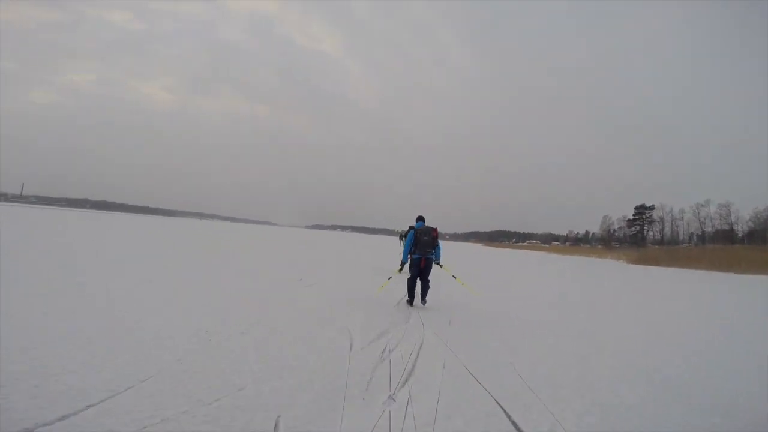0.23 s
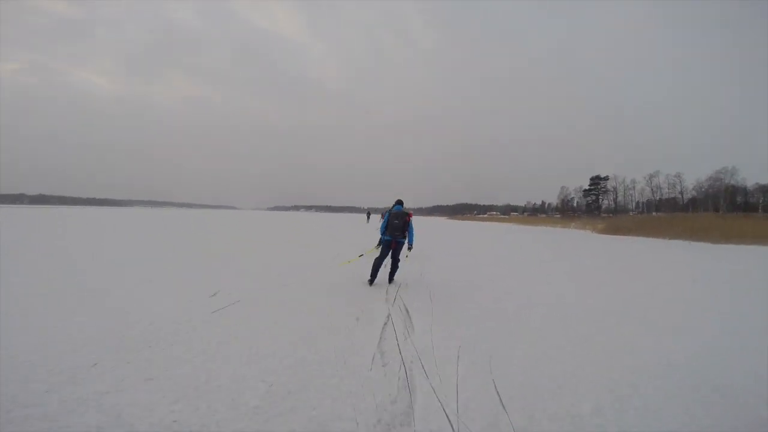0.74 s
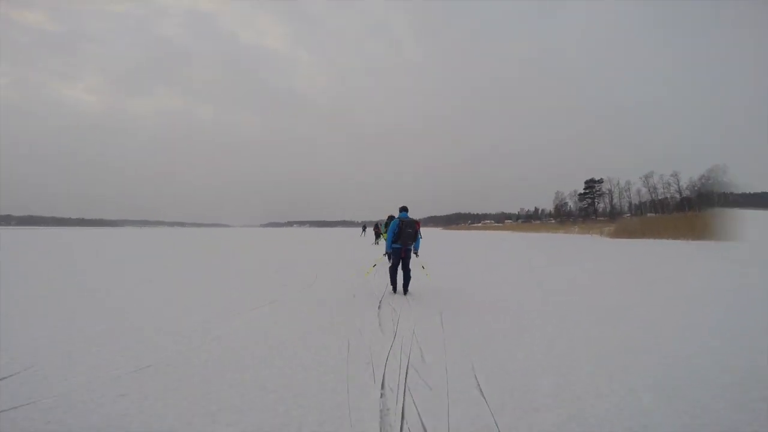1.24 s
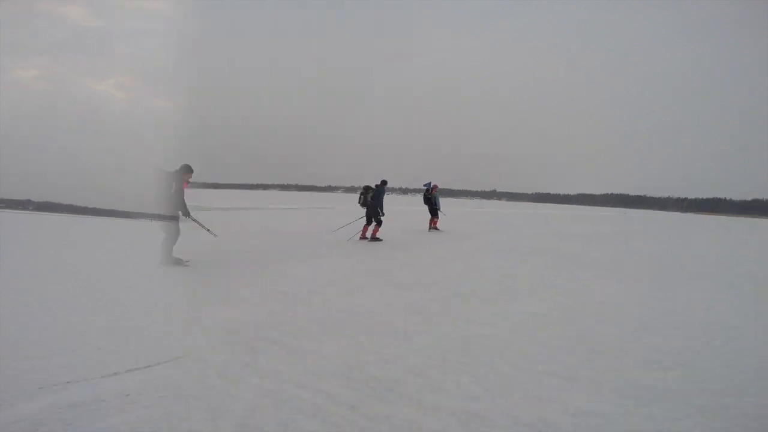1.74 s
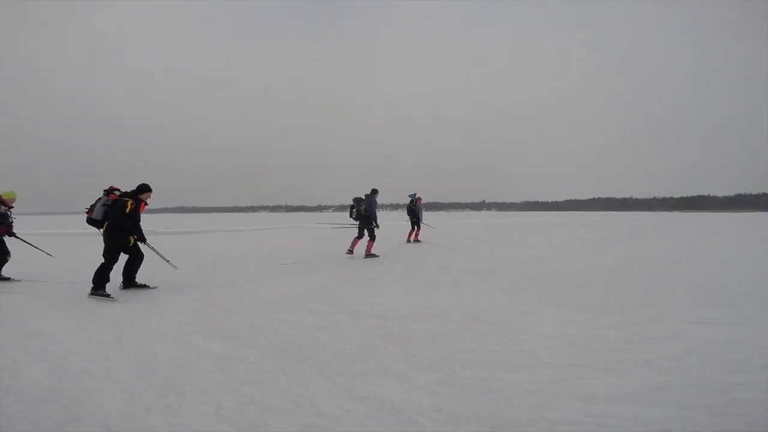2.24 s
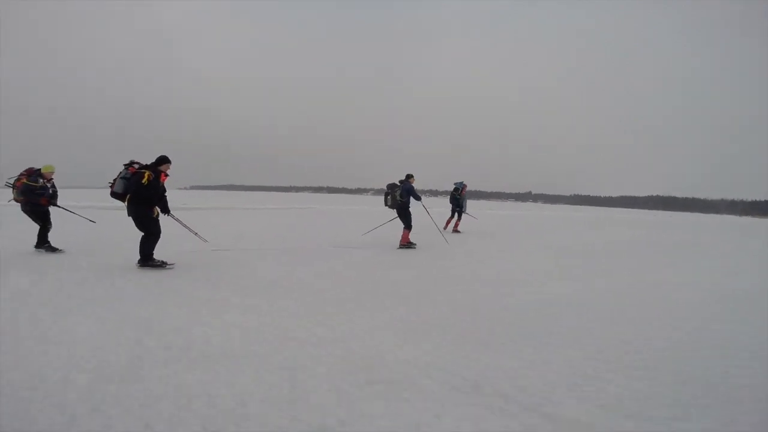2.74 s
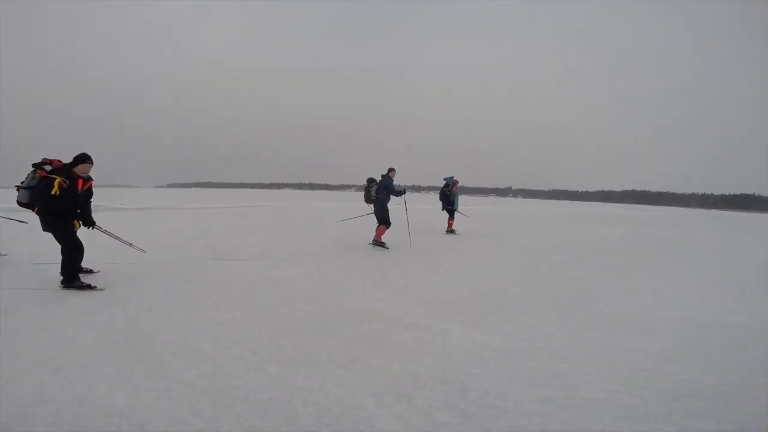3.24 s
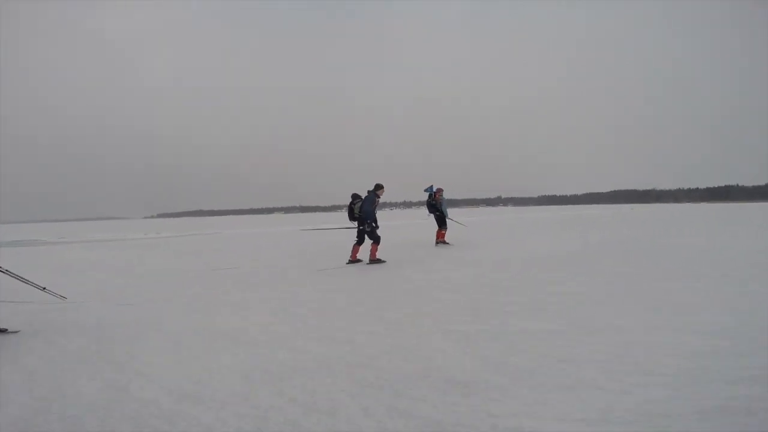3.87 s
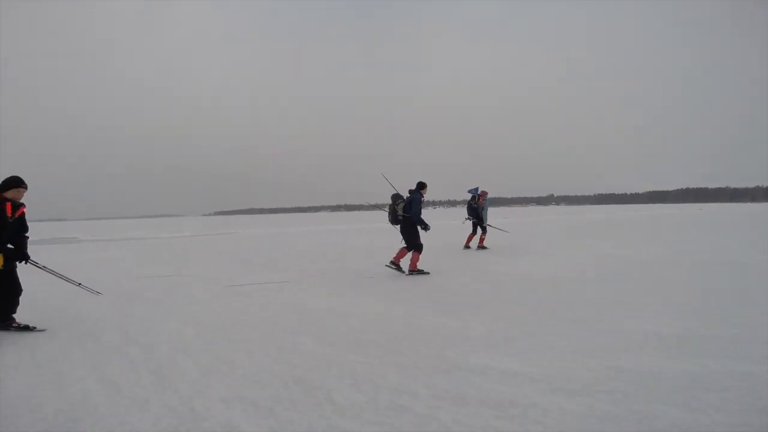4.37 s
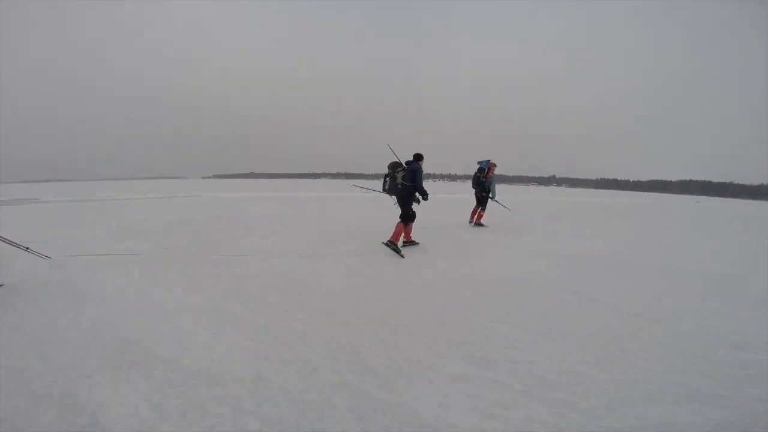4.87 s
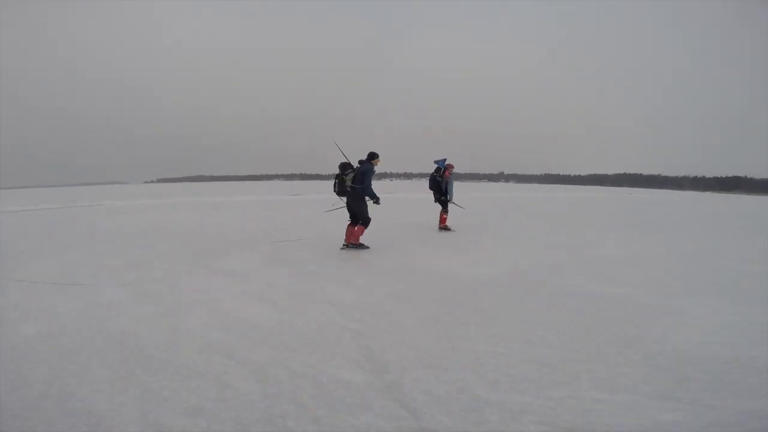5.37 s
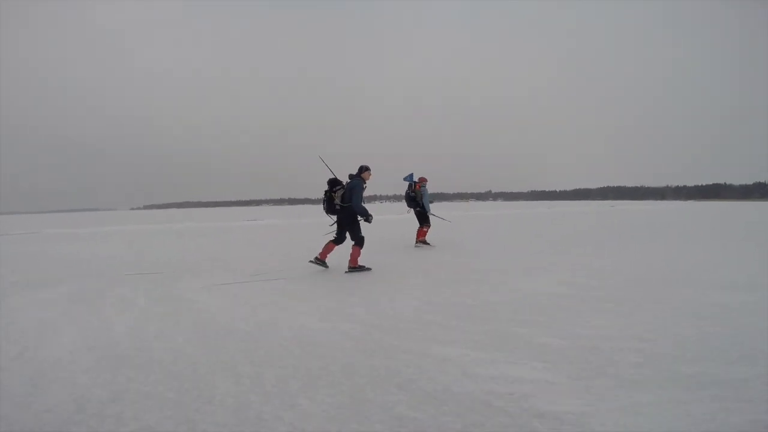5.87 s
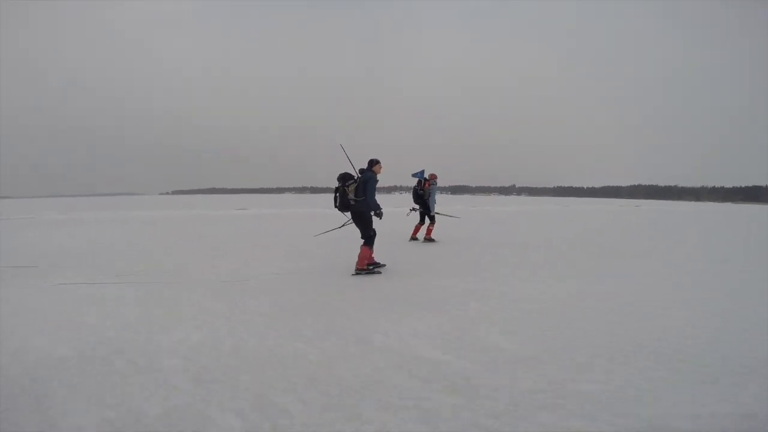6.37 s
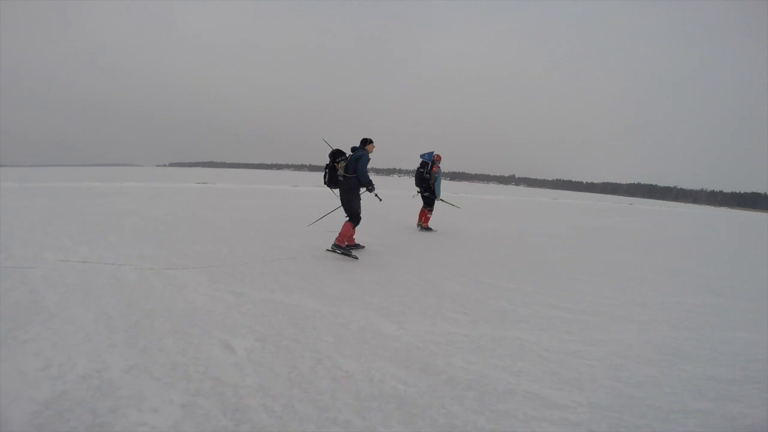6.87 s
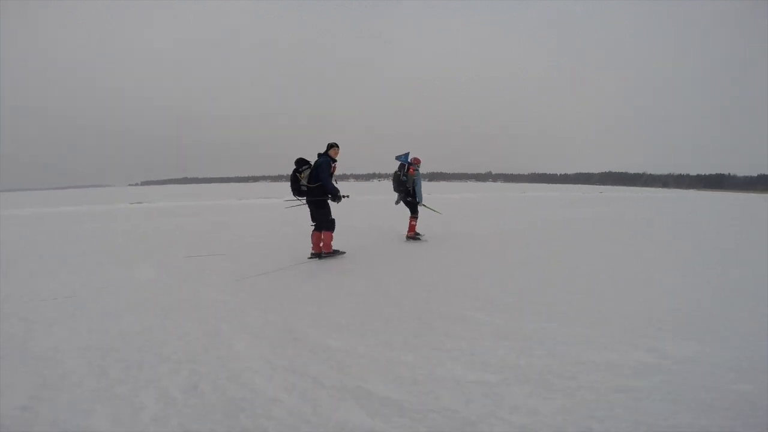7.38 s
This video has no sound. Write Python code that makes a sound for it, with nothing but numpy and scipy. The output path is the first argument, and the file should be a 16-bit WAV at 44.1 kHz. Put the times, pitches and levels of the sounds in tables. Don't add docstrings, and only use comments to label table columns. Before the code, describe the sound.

A small camera shut in a hard case rides with a skater across a frozen lake, so everything is close, boxy and dry. Low wind buffeting starts weak, swells by 0.3 s, drops near 0.8, then surges around 3.2 and from 3.8 to 6.5. Under it steel blades rub continuously with a thin icy hiss. Thuds and a clack come at 0.3 to 0.7; a short ping at 0.85; the loudest, densest rattle of jolts and scraping runs 1.0 to 1.4. Around 2.0 a blade bites and judders, followed by frequent knocks and bright chips through 3.4. A longer, soft singing scrape begins at 3.7. Light steel taps cluster at 4.0 to 4.6, a slow cracking judder at 4.7, then a sparser stretch. Quick catches and pole clicks bunch at 5.7 to 6.1, taps continue 6.2 to 7.4, and a buzzing bite closes at 7.5.

```python
import sys
import numpy as np
from scipy import signal
from scipy.fft import rfft, irfft, next_fast_len
from scipy.io import wavfile
from scipy.ndimage import uniform_filter1d

SR = 44100
rng = np.random.default_rng(int(sys.argv[2]) if len(sys.argv) > 2 else 0)


def to_wav(sig):
    pcm = np.clip(np.atleast_2d(sig), -1, 1) * 32767
    pcm = np.round(pcm).astype(np.int16)
    wavfile.write(sys.argv[1], SR, pcm.T)


def convert_level_to_amplitude(level_db):
    exponent = np.asarray(level_db, float) / 20
    return 10 ** exponent


N = 335601
TIME = np.arange(N) / SR

# (time [s], gust level [dB], share of fine eddies [dB])
WIND_GUSTS = [(0.0, -37.5, -12), (.274, -22.5, -11), (.55, -24, -14.5), (.83, -34.5, -14.5),
              (1.15, -27, -7.5), (1.76, -33, -2), (2.07, -26, -6), (3.2, -19, -9), (3.29, -29, -9),
              (3.5, -28.5, -5.5), (3.79, -19, -8.5), (4.4, -19.5, -2.5), (5.4, -22, -6.5), (6.1, -20, -4.5),
              (6.9, -24, -2.5), (7.07, -34.5, 0), (7.3, -24, -5), (7.61, -24, -6.5)]
# (frequency [Hz], level [dB per Hz])
RUMBLE_TONE = [(26, -52), (45, -1), (86, 2.5), (140, -0.5), (258, -9), (400, -18), (520, -45), (880, -120)]
# (frequency [Hz], level [dB per Hz])
WHOOSH_TONE = [(88, -15), (150, -1.5), (189, -4), (421, -7), (655, -13), (841, -14.5), (1500, -30),
               (1950, -88), (3300, -120)]
# (frequency [Hz], width [Hz], level [dB])
CASE_MODES = [(906, 132, 1.5), (1830, 367, -6.5), (2805, 66, -19.5), (3034, 187, -19)]
# (frequency [Hz], level [dB per Hz])
DUST_TONE = [(2290, -10.5), (3900, 0.5), (4530, -2.5), (4940, 1), (5480, -4.5), (6370, -2), (6830, -5),
             (8500, -6.5), (9270, -11), (11800, -11), (14800, -28), (15500, -26)]
# (start [s], length [s], scrape level [dB], ice dust over scrape [dB],
# swell from start to end [dB])
STROKES = [(0.258, 0.3, -37, -13.5, -8), (1.013, 0.26, -30.5, -15.5, -4.5), (1.185, 0.11, -27.5, -8.5, 2),
           (1.313, 0.12, -35.5, -8, 4), (1.72, 0.3, -43, -13.5, -2), (2.037, 0.29, -39, -15, -9),
           (2.818, 0.41, -36.5, -15.5, 5), (3.658, 0.67, -38.5, -11.5, -9), (4.728, 0.177, -34, -22, -10),
           (5.733, 0.31, -31, -14.5, -0.5), (6.567, 0.24, -38.5, -16.5, -10), (7.47, 0.24, -36, -18, -10)]
# (time [s], thud level [dB], ring over thud [dB], crack over thud [dB])
BUMPS = [(0.041, -22.5, -36, -24), (0.134, -23, -13, -32), (0.3, -10.5, -11, -26), (0.723, -12, -8, -44),
         (0.794, -18, -25, -30), (0.854, -26.5, 6, -5), (1.058, -13, 5.5, -25), (1.21, -10, -4, -15),
         (1.239, -3, 3, -26), (1.258, -8, -1, -24), (1.277, -8, -13, -20), (1.314, -23, -3, -13),
         (1.337, -20.5, -12, -21), (1.375, -14, -1.5, -22), (1.411, -4.5, -3, -22.5),
         (1.822, -17.5, 4, -24.5), (1.872, -13, 0.5, -20), (2.019, -11.5, -8, -25), (2.157, -11, 2.5, -25),
         (2.397, -12, 0, -23.5), (2.55, -16, -1.5, -17), (2.764, -14.5, -6, -15.5), (3.232, -10, 1, -22.5),
         (3.678, -18, 0, -12), (4.077, -14.5, -4, -19), (4.477, -13.5, -0.5, -23.5), (5.159, -16, -19, -25),
         (6.523, -11.5, -0.5, -17.5), (6.937, -13, 4.5, -19)]
# (time [s], peak [dB], ring [Hz], crack [dB])
POLES = [(0.1885, -23, 1770, -32), (0.5317, -7.5, 1900, -24), (0.818, -24, 1680, -15),
         (1.0375, -16.5, 1960, -14), (1.1982, -7, 1820, -41), (1.2654, -11, 1990, -13),
         (1.5748, -18.5, 2280, -25.5), (1.7075, -24, 2020, -24), (1.8966, -9.5, 1690, -25),
         (2.0068, -13.5, 1820, -28.5), (2.2398, -14.5, 2140, -22.5), (2.2702, -11.5, 1750, -26),
         (2.5785, -20.5, 1780, -37), (2.7142, -24, 2020, -19), (3.1023, -13.5, 1830, -17.5),
         (3.1842, -13.5, 1680, -28), (3.277, -9.5, 1730, -28.5), (3.3538, -21, 1710, -22),
         (3.9125, -11, 1960, -17.5), (4.0243, -23, 1990, -23), (5.3677, -12.5, 1730, -25.5),
         (5.7573, -14, 1810, -32), (5.8072, -11, 2120, -21), (5.8436, -18.5, 1830, -13),
         (5.9084, -14, 1820, -19.5), (6.0192, -17, 1830, -33), (6.0586, -13, 2640, -12),
         (6.8728, -23, 1730, -29), (6.8862, -8, 1820, -26.5), (7.2419, -22, 1740, -34)]
# (time [s], peak [dB], crack [dB])
CHIPS = [(0.2386, -40, -3), (0.293, -21, -20.5), (0.401, -36, -17), (0.4724, -24, -24), (0.553, -31, -10),
         (0.7078, -19, -30), (1.0216, -25, -9), (1.1284, -26, -21), (1.1623, -22, -19), (1.8016, -17, -33),
         (1.9394, -31, -7), (1.9715, -19, -21), (2.4584, -19.5, -18.5), (2.6274, -15, -31),
         (2.847, -12, -30), (2.913, -19.5, -31), (2.9966, -30, -19), (3.041, -13.5, -21),
         (3.1185, -17, -19), (3.583, -21, -25), (3.6004, -25, -16.5), (3.9833, -32, -10), (4.4247, -33, -9),
         (4.546, -38.5, -5), (5.0035, -23, -17), (5.18, -34, -12), (5.9735, -47, 9), (6.7867, -33, -9),
         (7.141, -18.5, -24), (7.425, -25, -20)]
# (time [s], peak [dB], crack [dB])
TICKS = [(0.9337, -30, -15), (1.511, -29, -41), (1.5954, -23.5, -31), (1.6866, -25.5, -25.5),
         (1.7535, -28.5, -21), (1.923, -30, -23), (2.198, -22, -25), (2.369, -22, -27), (2.5223, -29, -36),
         (3.3185, -23.5, -37), (3.393, -27, -36), (3.647, -22.5, -25), (4.307, -23, -25.5),
         (4.366, -21.5, -22.5), (4.589, -24.5, -22), (4.6202, -23, -26), (5.613, -24, -44),
         (6.9685, -30, -34)]
# (time [s], peak [dB], ring [Hz], crack [dB])
TAPS = [(1.5297, -15.5, 1830, -28.5), (2.326, -19, 2700, -13.5), (2.344, -14, 2020, -36),
        (2.813, -19, 2000, -15), (3.77, -21.5, 1940, -33), (4.1101, -21.5, 1790, -16),
        (4.262, -9, 1728, -30), (4.398, -18.5, 1630, -26.5), (4.4534, -11.5, 1760, -33),
        (4.8584, -16.5, 1910, -30), (5.0498, -20, 1870, -25.5), (5.4136, -23, 2020, -27),
        (5.454, -16, 1750, -31), (5.881, -15, 1780, -20), (5.939, -23, 1700, -28),
        (6.2357, -11.5, 1830, -35), (6.2901, -23, 1700, -34), (6.3832, -9, 1800, -27.5),
        (6.575, -14, 2100, -30), (6.6155, -14.5, 1770, -26), (6.767, -8.5, 1750, -39),
        (6.834, -9.5, 1780, -30.5), (6.994, -17, 2050, -21), (7.0725, -17, 1750, -39),
        (7.3683, -16.5, 1960, -23.5), (7.4034, -21, 2040, -26)]
# (time [s], length [s], level [dB])
BITES = [
    (2.011, 0.14, -28),
    (3.685, 0.43, -33),
    (4.705, 0.12, -46),
    (5.709, 0.092, -32),
    (5.88, .08, -29),
    (6.577, 0.13, -33.5),
    (7.461, 0.089, -25),
]
# (time [s], peak [dB], crack [dB])
CATCHES = [(2.0612, -11.5, -25), (2.0884, -13, -25), (2.1104, -17, -26), (3.7234, -13, -26),
           (4.7034, -12, -32), (4.8242, -25.5, -14), (5.7102, -8, -28.5), (5.7267, -12.5, -30),
           (5.7654, -15, -24), (5.782, -15.5, -22), (5.817, -19, -24), (7.499, -26, -21), (7.512, -19, -28),
           (7.5303, -15, -27), (7.5562, -8.5, -24), (7.5657, -9.5, -35)]
# (time [s], period [s], first slip [dB], fade per slip [dB], crack [dB])
JUDDER = [
    (2.025, 0.012, -11.5, 6, -34),
    (3.693, 0.0093, -22, 2.5, -40),
    (4.723, 0.014, -12.5, 2.5, -28.5),
    (7.464, .0092, -14.5, 1, -33),
]

MUFFLE = signal.ellip(5, 1, 45, 3500, fs=SR, output="sos")

OPENING_S, OPENING_DUST_DB, OPENING_HEAVE_DB = 1.5, 5.5, 2.5
CALM_DB, HEAVE_DB, HEAVE_PER_GUST, HEAVE_SWING_DB = -26.5, -34, 0.3, 2.5
COAST_DB, COAST_PER_GUST, COAST_DUST_DB = -45.5, 0.29, -13.5
SET_DOWN_S, LIFT_S = 0.0091, 0.024

RING_HZ, UPPER_HZ = 1780, 3090
LEAD_S = 0.0006
CRACK_TRIM_DB, BUMP_TRIM_DB = -6.5, -2
POLE_THUD_DB, TAP_THUD_DB, CATCH_THUD_DB = -6, -8.5, -10.5
UPPER_DB, UPPER_PER_CRACK, USUAL_CRACK_DB = -11, 0.77, -34


def unit(x):
    return x / np.sqrt(np.mean(x ** 2))


def curves(table):
    s, *columns = np.transpose(table)
    return [np.interp(TIME, s, c) for c in columns]


def colour(x, points):
    hz, db = np.transpose(points)
    size = next_fast_len(len(x))
    f = np.arange(size // 2 + 1) * SR / size + 1
    gain = convert_level_to_amplitude(np.interp(np.log(f), np.log(hz), db))
    return irfft(rfft(x, size) * gain, size)[:len(x)]


def resonate(x, hz, width):
    r = np.exp(-np.pi * width / SR)
    turn = 2 * np.pi * hz / SR
    return signal.lfilter([2 * (1 - r) * np.sin(turn)], [1, -2 * r * np.cos(turn), r * r], x)


def walk(rate):
    k = max(int(SR / rate), 1)
    held = rng.standard_normal(N)[np.arange(N) // k]
    return unit(uniform_filter1d(uniform_filter1d(held, k), k))


def grit(per_s, spread_db, smear_s):
    chance = rng.random((2, N))
    sizes = convert_level_to_amplitude(-spread_db * np.log(1.05 - chance[1]))
    chips = (chance[0] < per_s / SR) * sizes
    return signal.lfilter([1], [1, -np.exp(-1 / (smear_s * SR))], chips)


def wind():
    gust_db, fine_db = curves(WIND_GUSTS)
    lumps_db = 0.9 * walk(rate=30)
    rumble = unit(colour(rng.standard_normal(N), RUMBLE_TONE)) * convert_level_to_amplitude(1.3 * lumps_db)
    puffs = convert_level_to_amplitude(0.8 * walk(rate=45) + 2.4 * walk(rate=110) + lumps_db)
    whoosh = unit(colour(rng.standard_normal(N) * puffs, WHOOSH_TONE))
    heave = unit(resonate(rng.standard_normal(N), 34, 30))
    heave_db = HEAVE_DB + HEAVE_PER_GUST * (gust_db - CALM_DB) + HEAVE_SWING_DB * walk(rate=4)
    heave_db = heave_db + OPENING_HEAVE_DB * (TIME < OPENING_S)
    buffet = rumble * convert_level_to_amplitude(1.0) + whoosh * convert_level_to_amplitude(fine_db + 3.5)
    return convert_level_to_amplitude(gust_db) * buffet + heave * convert_level_to_amplitude(heave_db)


def pressure():
    gust_db = curves(WIND_GUSTS)[0]
    scrape = convert_level_to_amplitude(COAST_DB + COAST_PER_GUST * (gust_db - CALM_DB))
    dust = scrape * convert_level_to_amplitude(COAST_DUST_DB + OPENING_DUST_DB * (TIME < OPENING_S))
    for s, length, db, dust_db, swell_db in STROKES:
        on = np.clip(np.minimum((TIME - s) / SET_DOWN_S, (s + length - TIME) / LIFT_S), 0, 1)
        progress = np.clip((TIME - s) / length, 0, 1)
        push = on * convert_level_to_amplitude(db + swell_db * (progress - 0.5))
        scrape = np.hypot(scrape, push)
        dust = np.hypot(dust, push * convert_level_to_amplitude(dust_db))
    return scrape, dust


def blades():
    scrape, spray = pressure()
    chips = unit(grit(per_s=300, spread_db=6.5, smear_s=0.0027))
    sway = convert_level_to_amplitude(2.2 * walk(rate=60))
    rough = convert_level_to_amplitude(-1.5) * sway + chips
    rub = np.diff(rng.standard_normal(N + 1)) * rough
    body = np.zeros(N)
    for k, (hz, width, db) in enumerate(CASE_MODES):
        body += (-1) ** k * convert_level_to_amplitude(db) * resonate(rub, hz, width)
    body = signal.sosfilt(MUFFLE, body)
    sparkle = unit(grit(per_s=63, spread_db=0.0, smear_s=0.002))
    dust = colour(rng.standard_normal(N) * (rough + 0.13 * sparkle), DUST_TONE)
    return unit(body) * scrape * convert_level_to_amplitude(2.5) + unit(dust) * spray


def whine():
    return convert_level_to_amplitude(-80 + 2) * np.sin(2 * np.pi * 14625 * TIME)


def hit(s, peak_db, thud_db, crack_db, ring_hz):
    crack_db = crack_db + CRACK_TRIM_DB
    hard_db = crack_db - max(thud_db, 0) - USUAL_CRACK_DB
    return s - LEAD_S, peak_db, thud_db, crack_db, ring_hz, UPPER_DB + UPPER_PER_CRACK * hard_db


def steep(x, hz, width):
    return resonate(resonate(x, hz, width), hz, 4.9 * width)


def knocks(table, t60, crumble_s):
    size = 4096
    out = np.zeros(N + size)
    t = np.arange(size) / SR
    crumble = np.exp(-(t / crumble_s) ** 2) + 0.91 * np.exp(-t / 0.0019)
    for s, peak_db, thud_db, crack_db, ring_hz, upper_db in table:
        contact = rng.standard_normal(size) * crumble
        grain_db = 4.7 * rng.standard_normal(len(DUST_TONE))
        dull = signal.sosfilt(MUFFLE, np.diff(contact + 12 * (t == 0), prepend=0))
        singing = any(0 < s - start + 0.003 < length for start, length, _ in BITES)
        free = 2.5 if singing else 1
        ring = steep(dull, ring_hz, np.log(1000) / np.pi / (t60 * free))
        thud = steep(dull, CASE_MODES[0][0], 336)
        upper = resonate(dull, UPPER_HZ * (1 + 0.011 * grain_db[0]), 400)
        crack = colour(contact, [(hz, db + g) for (hz, db), g in zip(DUST_TONE, grain_db)])
        parts = [(ring, -1.5), (thud, thud_db + 3.5),
                 (upper, min(upper_db, -6) - 0.5), (crack, crack_db + 13.5)]
        at = int(s * SR)
        out[at:at + size] += convert_level_to_amplitude(peak_db) * sum(convert_level_to_amplitude(db) * p / np.abs(p).max() for p, db in parts)
    return out[:N]


def bumps():
    rows = [hit(s, db + ring + BUMP_TRIM_DB, -ring, crack - ring, RING_HZ)
            for s, db, ring, crack in BUMPS]
    return knocks(rows, t60=0.011, crumble_s=0.0045)


def poles():
    rows = [hit(s, db, POLE_THUD_DB, crack, hz) for s, db, hz, crack in POLES]
    return knocks(rows, t60=0.011, crumble_s=0.0045)


def chips():
    rows = [hit(s, db - 5, -5.5, crack + 4, CASE_MODES[1][0]) for s, db, crack in CHIPS]
    return knocks(rows, t60=0.009, crumble_s=0.0062)


def ping():
    t = np.maximum(TIME - 0.853, 0)
    t60_s = 0.079
    return convert_level_to_amplitude(-25 - 60 * t / t60_s) * np.sin(2 * np.pi * 720 * t)


def ticks():
    rows = [(s, db, -6, crack, CASE_MODES[1][0], -9) for s, db, crack in TICKS]
    return knocks(rows, t60=0.009, crumble_s=0.0062)


def taps():
    rows = [hit(s, db, TAP_THUD_DB, crack, hz) for s, db, hz, crack in TAPS]
    return knocks(rows, t60=0.01, crumble_s=0.003)


def song():
    press = np.zeros(N)
    for s, length, db in BITES:
        down = (TIME > s) * (TIME < s + length)
        press += convert_level_to_amplitude(db) * down * np.exp(-0.9 * np.abs(TIME - s) / length)
    chatter = convert_level_to_amplitude(2.0 * walk(rate=81)) * rng.standard_normal(N)
    steel = unit(resonate(chatter, 1800, 80))
    return steel * uniform_filter1d(press, size=100)


def catches():
    grabs = list(CATCHES)
    for s, period, db, fade, crack in JUDDER:
        grabs += [(s + k * period, db - k * fade, crack - CRACK_TRIM_DB) for k in range(8)]
    rows = [hit(s, db, CATCH_THUD_DB, crack, RING_HZ) for s, db, crack in grabs]
    return knocks(rows, t60=0.013, crumble_s=0.003)


def scene():
    bed = wind() + blades() + whine()
    case_hits = bumps() + poles() + chips() + ping() + ticks() + taps()
    biting = song() + catches()
    return (bed + case_hits + biting)[None]


def top_cut(x):
    return signal.sosfilt(signal.butter(12, 15810, fs=SR, output="sos"), x)


def record(dry):
    top = signal.cheby1(8, 0.5, 14800, fs=SR, output="sos")
    loud = np.tanh(0.62 * dry) / 0.59
    return top_cut(signal.sosfilt(top, loud))


dry = scene()
out = record(dry)
to_wav(out)
```